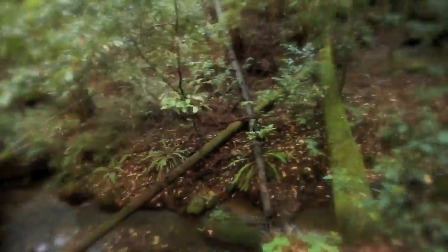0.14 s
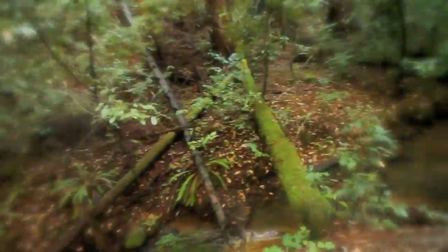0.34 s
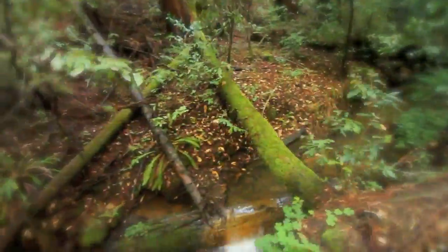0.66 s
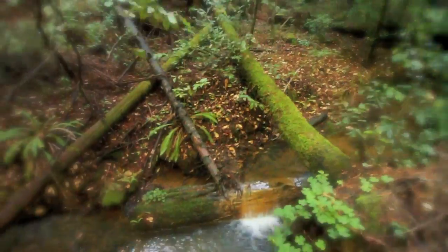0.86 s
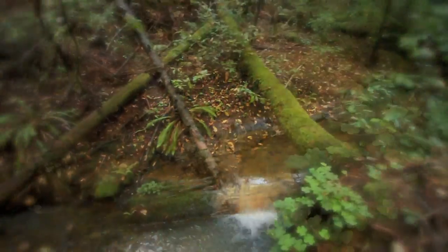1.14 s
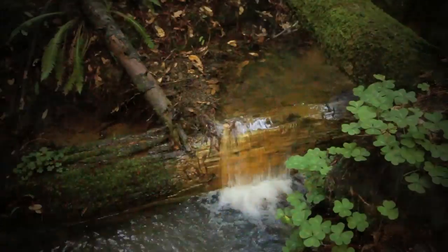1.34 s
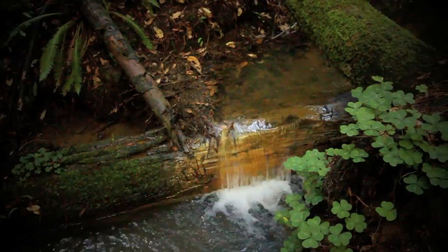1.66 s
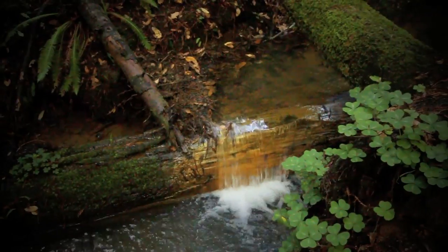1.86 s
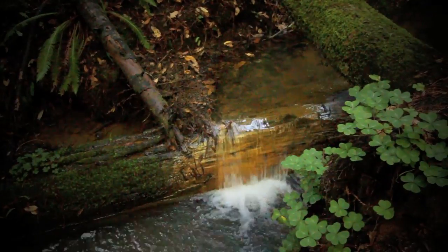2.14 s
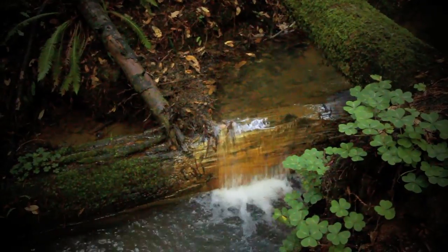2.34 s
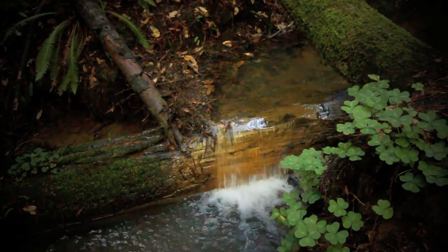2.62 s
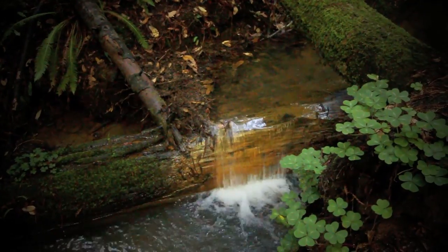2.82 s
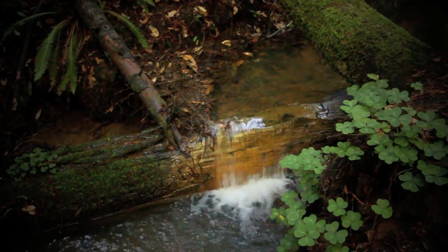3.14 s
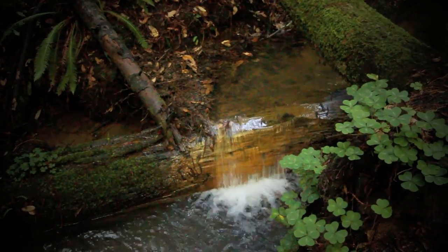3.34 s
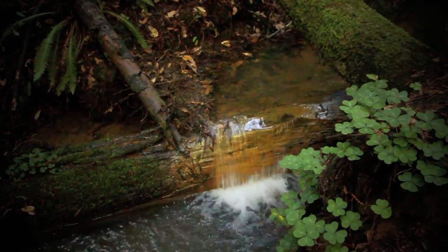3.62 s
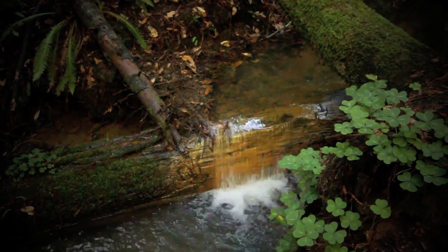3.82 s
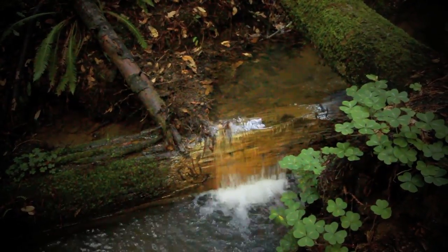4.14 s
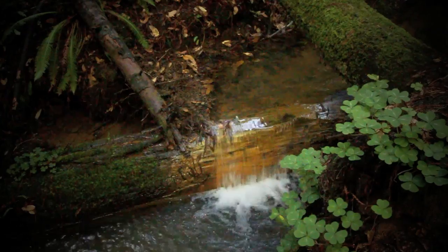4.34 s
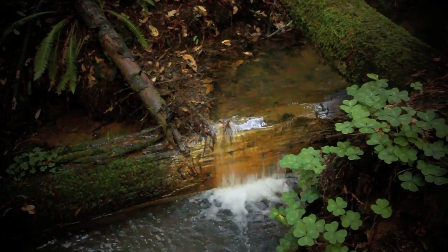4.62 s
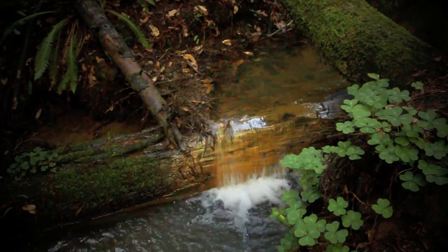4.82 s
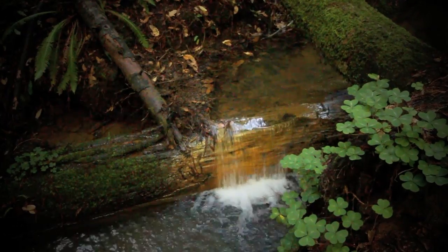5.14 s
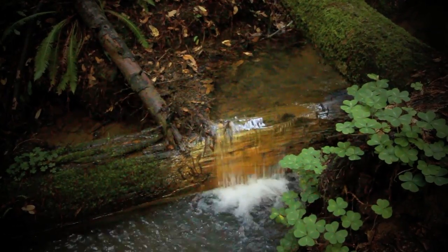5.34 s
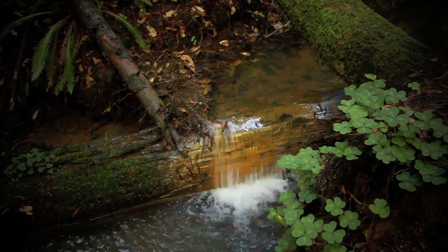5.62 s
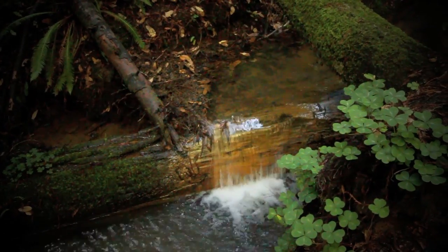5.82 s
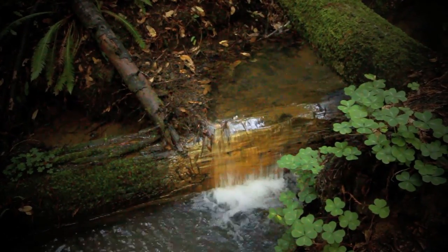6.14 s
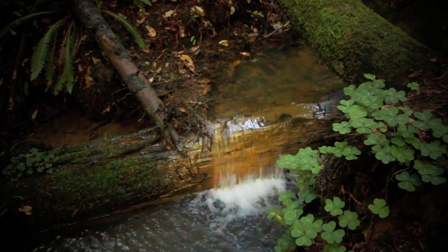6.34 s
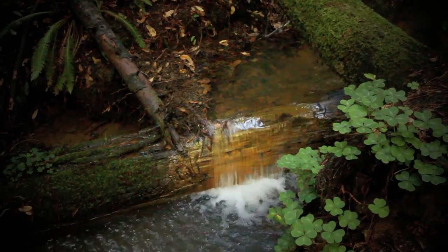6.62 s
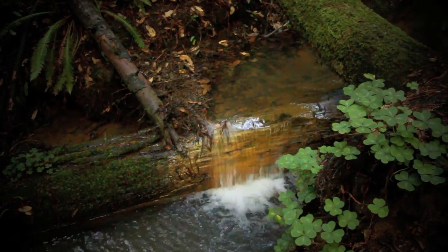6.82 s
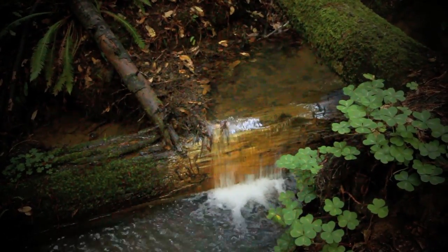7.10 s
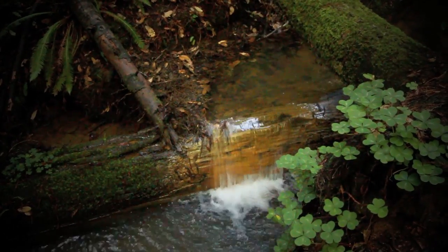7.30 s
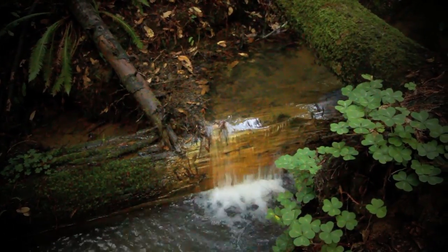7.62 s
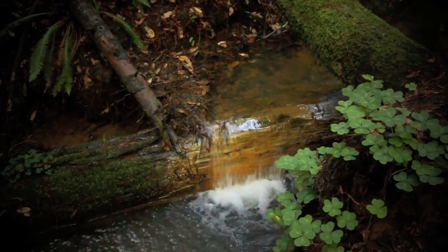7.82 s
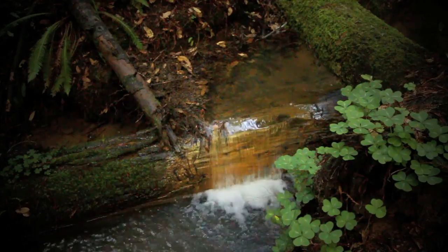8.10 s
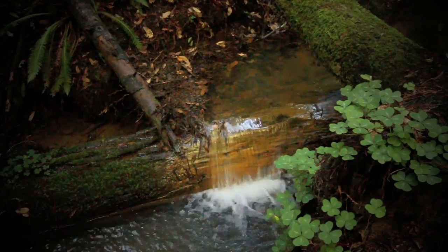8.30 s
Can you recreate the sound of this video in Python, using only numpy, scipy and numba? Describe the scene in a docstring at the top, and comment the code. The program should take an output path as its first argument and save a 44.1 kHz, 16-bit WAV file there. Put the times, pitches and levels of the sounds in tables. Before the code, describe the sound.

A faint, distant creek swells into a small, close waterfall splashing and bubbling into a forest pool.

```python
"""A thin, distant rush with a few faint squeaks and knocks, then a close fall: a forest creek spills
over a log into a pool. A ground echo colours the distant rush and shifts as the listener nears.
The fall is a dense wash of splashes, ringing air bubbles and spray ticks, with single loud pops,
a resonant hollow under the log and the low churn of air driven into the plunge pool."""
import sys
import numpy as np
from scipy import signal
from scipy.fft import rfft, irfft, next_fast_len
from scipy.io import wavfile
from numba import njit

SR = 44100
rng = np.random.default_rng(int(sys.argv[2]) if len(sys.argv) > 2 else 0)


def int16_out(signal):
    """Quantize to a 16-bit WAV file."""
    q = np.round(np.clip(np.atleast_2d(signal).T, -1, 1) * 32767)
    wavfile.write(sys.argv[1], SR, q.astype(np.int16))


N = 373086
TIME = np.arange(N) / SR
N_FFT = next_fast_len(N)
BIN_HZ = np.maximum(np.fft.rfftfreq(N_FFT, 1 / SR), 1)
CUTOFF_HZ = 15750


def from_db(db):
    """Decibels to gain."""
    return 10 ** (np.asarray(db) / 20)


def rms_one(x):
    """Scale to rms 1."""
    return x / np.sqrt(np.mean(x ** 2) + 1e-20)


def ramp(start_s, length_s):
    """Linear rise from 0 to 1."""
    return np.clip((TIME - start_s) / length_s, 0, 1)


def drift(rate_hz):
    """Smooth random wander, rms 1."""
    hop, settle = 40, 2000
    pole = np.exp(-2 * np.pi * rate_hz * hop / SR)
    noise = rng.standard_normal(N // hop + settle + 2)
    slow = signal.lfilter([1], [1, -2 * pole, pole * pole], noise)[settle:]
    return np.interp(np.arange(N) / hop, np.arange(len(slow)), rms_one(slow))


def coloured(x, colour):
    """Filter by a curve of (f/Hz, relative level/dB); rms 1."""
    hz, db = np.transpose(colour)
    gain = from_db(np.interp(np.log(BIN_HZ), np.log(hz), db))
    return rms_one(irfft(rfft(x, N_FFT) * gain, N_FFT)[:N])


@njit
def moving_band(x, hz, width_hz):
    """Unity-gain band-pass with a gliding centre."""
    out, low, band = np.zeros(N), 0., 0.
    for i in range(N):
        step, damping = 2 * np.sin(np.pi * hz[i] / SR), width_hz / hz[i]
        low += step * band
        new = band + step * (x[i] - low - damping * band)
        out[i] = damping * (band + new) / 2
        band = new
    return out


@njit
def ringing(start, hz, peak, t60_s, rise):
    """Damped sines; each climbs in pitch as its bubble nears the surface."""
    out = np.zeros(N)
    for k in range(len(start)):
        length = t60_s[k] * SR
        for i in range(min(int(length), N - start[k])):
            age = i / length
            phase = 2 * np.pi * hz[k] * i / SR * (1 + rise * age / 2)
            out[start[k] + i] += peak[k] * 1000. ** -age * np.sin(phase)
    return out


def bubbles(low_hz, high_hz, cycles, spread_db, rise, count):
    """Bubbles born at random, uniform in log pitch, a few much stronger than the rest; rms 1."""
    when, size, luck, decay = rng.random((count, 4)).T
    hz = low_hz * (min(high_hz, CUTOFF_HZ) / low_hz) ** size
    strength = np.minimum(-np.log(1 - luck), 4.5)
    peak = hz * from_db(spread_db * strength)  # factor hz keeps the band white
    t60_s = cycles * (.5 + decay) / hz
    return rms_one(ringing((when * N).astype(np.int64), hz, peak, t60_s, rise))


def far_creek():
    """Distant fizz and its ground echo grow on approach; notches fall as the path difference grows."""
    # creek spectrum: f/Hz, relative level/dB
    far_colour = [(30, -42), (130, -25.5), (250, -21), (400, -7), (680, -2), (1200, 0), (1650, 0.5),
                  (2100, 2), (2700, 1), (3600, 1.5), (5600, 1.6), (9000, -0.5), (13000, -1.5), (16000, -5)]
    # bands the echo cancels: t/s, low notch f/Hz, high notch f/Hz
    echo_notches = [(.15, 2600, 6200), (.5, 1780, 4600), (.79, 1550, 3450), (.88, 1150, 3100),
                    (1.15, 1000, 3280)]
    fizz = bubbles(low_hz=392, high_hz=15000, cycles=12, spread_db=3, rise=.1, count=30000)
    direct = coloured(rng.standard_normal(N) + from_db(-6.5) * fizz, far_colour)
    t_s, low_hz, high_hz = np.transpose(echo_notches)
    low_band = moving_band(direct, np.interp(TIME, t_s, low_hz), width_hz=530.)
    high_band = moving_band(direct, np.interp(TIME, t_s, high_hz), width_hz=510.)
    crest = moving_band(direct, hz=np.full(N, 2400.), width_hz=480.)
    nearness = ramp(start_s=.054, length_s=.71)
    echo = .62 * np.sqrt(nearness) * (.81 * crest - low_band - .77 * high_band)
    return from_db(-38 + 7 * nearness) * (direct + echo)


def squeaks(fall_per_s=7.3):
    """Short falling tones with their octave."""
    # centre t/s, f/Hz, length/s, fundamental level/dB, octave level/dB
    tones = [(0.015, 1140, 0.016, -33.5, -44), (0.061, 970, .024, -39, -33), (0.073, 830, 0.039, -45, -56),
             (.106, 790, .025, -47, -41)]
    out = np.zeros(N)
    for t_s, hz, length_s, first_db, octave_db in tones:
        offset_s = TIME - t_s
        phase = 2 * np.pi * hz * offset_s * (1 - fall_per_s * offset_s / 2)
        swell = np.cos(np.pi * np.clip(offset_s / length_s, -.5, .5)) ** 2
        out += swell * (from_db(first_db) * np.sin(phase) + from_db(octave_db) * np.sin(2 * phase))
    return out


def knocks():
    """Soft knocks, each one dull, broadband pulse."""
    # t/s, peak level/dB, f/Hz
    pulses = [(.176, -30, 720), (.358, -28.5, 620), (.584, -30, 600), (.896, -36, 220)]
    out = np.zeros(N)
    for t_s, peak_db, hz in pulses:
        click = signal.unit_impulse(N, round(t_s * SR)) + 1e-18
        band_pass = signal.butter(2, [hz / 1.6, hz * 2.6], "band", fs=SR, output="sos")
        dull = signal.sosfilt(band_pass, click)
        out += from_db(peak_db) * dull / np.abs(dull).max()
    return out


def churn():
    """Air clouds driven deep into the pool throb as a whole."""
    # plunge pool spectrum: f/Hz, relative level/dB
    churn_colour = [(25, -48), (45, -30), (70, -20), (105, -6), (140, -4), (168, 0), (205, -5.5),
                    (245, -11), (400, -31.5)]
    return coloured(rng.standard_normal(N), churn_colour) * from_db(1.4 * drift(rate_hz=7.5))


def hollow():
    """Gulps of air ring the hollow under the log; each mode swells on its own."""
    # resonances: f/Hz, width/Hz, level/dB re the splash
    modes = [(293.4, 10.5, -33.5), (405, 26, -26.5), (522, 28, -22.5), (618, 21, -26)]
    out = np.zeros(N)
    for hz, width_hz, db in modes:
        tone = signal.lfilter(*signal.iirpeak(hz, hz / width_hz, fs=SR), rng.standard_normal(N))
        out += from_db(db) * rms_one(tone * from_db(3.1 * drift(rate_hz=3.6)))
    return out


def pops(count=60, low_hz=1493, high_hz=4820, cycles=102):
    """Single bubbles ring out above the wash, thin and without bass; lesser ones come at random."""
    # loudest bubbles: t/s, f/Hz, peak level/dB
    loud_pops = [(2.068, 2020, -23), (3.9036, 13260, -14), (4.594, 8870, -15), (4.729, 3560, -20),
                 (4.957, 2900, -19.5), (5.2725, 4820, -19), (5.868, 3400, -19), (6.47, 3360, -14.5),
                 (6.611, 3480, -18), (6.7574, 11280, -15), (8.036, 3220, -20)]
    when, size, luck = rng.random((count, 3)).T
    stray_hz = low_hz * (high_hz / low_hz) ** size
    stray_db = -26 + 2.5 * (2 * luck - 1)
    strays = np.transpose([when * N / SR, stray_hz, stray_db])
    t_s, hz, peak_db = np.vstack([loud_pops, strays]).T.copy()
    plinks = ringing((t_s * SR).astype(np.int64), hz, from_db(peak_db), t60_s=cycles / hz, rise=.063)
    return signal.sosfilt(signal.butter(2, 900, "high", fs=SR, output="sos"), plinks)


def wash(surge_db, flicker_db, flicker_hz):
    """Merged splashes: each half octave flickers on its own; the treble follows the surges most."""
    white = rfft(rng.standard_normal(N_FFT))
    band = np.clip(np.floor(2 * np.log2(BIN_HZ / 250)), 0, 11)
    out = np.zeros(N)
    for k, coupling in enumerate(np.linspace(.5, 1, 12)):
        noise = irfft(white * (band == k), N_FFT)[:N]
        out += noise * from_db(flicker_db * drift(flicker_hz) + coupling * surge_db)
    return rms_one(out)


def near_fall():
    """A sheet of water hits the pool in uneven surges, traps air and throws spray."""
    # splash spectrum: f/Hz, relative level/dB
    splash_colour = [(30, -50), (150, -35), (250, -9), (370, -2), (530, -1.1), (750, -2), (1350, .5),
                     (2500, -2.5), (3500, 0), (4800, -2.5), (6700, -5), (9800, -6.5), (12400, -3.5),
                     (15800, -11.5)]
    surge_db = .48 * drift(rate_hz=29)
    rush = wash(surge_db, flicker_db=1, flicker_hz=28)
    gurgle = bubbles(low_hz=301, high_hz=5500, cycles=27.6, spread_db=2.5, rise=.11, count=22000)
    glugs = bubbles(low_hz=326.6, high_hz=2200, cycles=34, spread_db=2, rise=.1, count=1600)
    spray = bubbles(low_hz=4430, high_hz=15600, cycles=13, spread_db=3, rise=.05, count=24000)
    grains = from_db(-10) * gurgle + from_db(-18.5) * glugs + from_db(-5) * spray
    splash = coloured(rush + grains * from_db(surge_db), splash_colour)
    return from_db(-24.5) * (splash + from_db(-22) * churn() + hollow())


def scene():
    """The distant creek crossfades to the close fall; both channels alike."""
    close = ramp(start_s=1.045, length_s=.5)
    mono = (1 - close) * far_creek() + close * (near_fall() + pops()) + squeaks() + knocks()
    return np.array([mono, mono])


def record(dry, low_cut_hz=28):
    """The microphone loses the deepest bass; the top is cut steeply."""
    lean = signal.sosfilt(signal.butter(2, low_cut_hz, "high", fs=SR, output="sos"), dry)
    return signal.sosfilt(signal.ellip(12, .1, 80, CUTOFF_HZ, fs=SR, output="sos"), lean)


dry = scene()
out = record(dry)
int16_out(out)
```